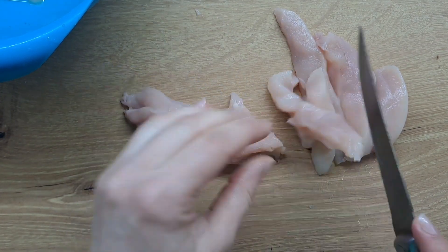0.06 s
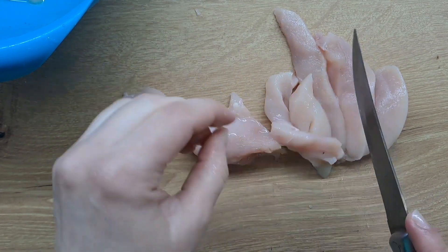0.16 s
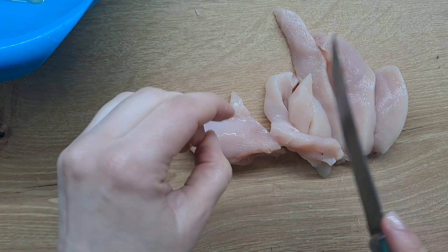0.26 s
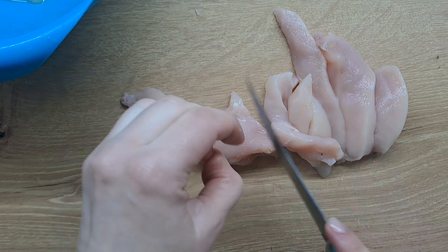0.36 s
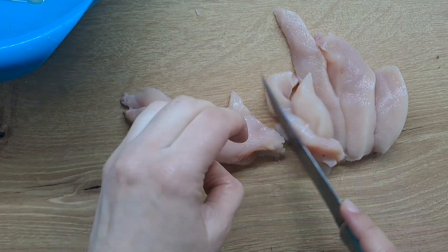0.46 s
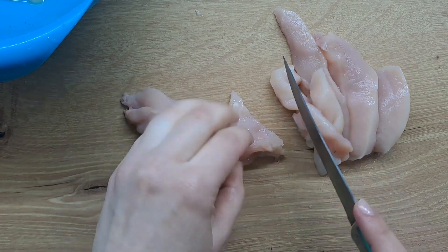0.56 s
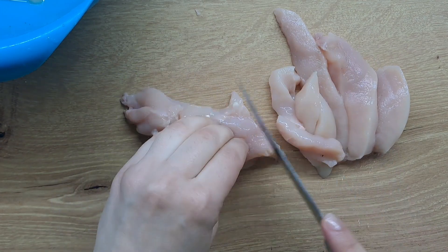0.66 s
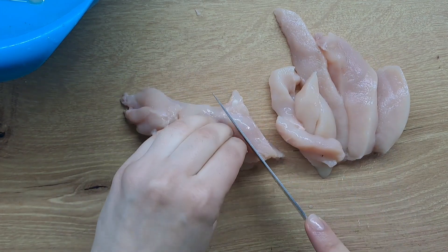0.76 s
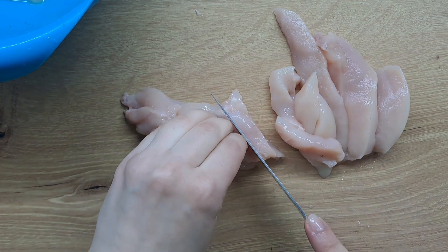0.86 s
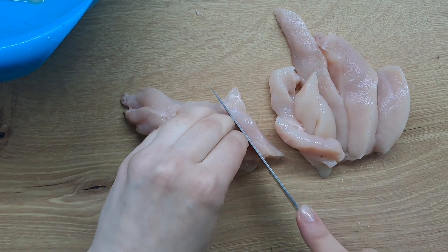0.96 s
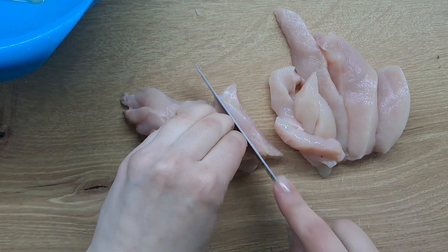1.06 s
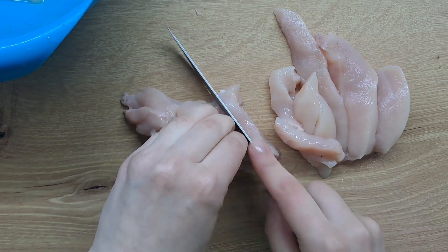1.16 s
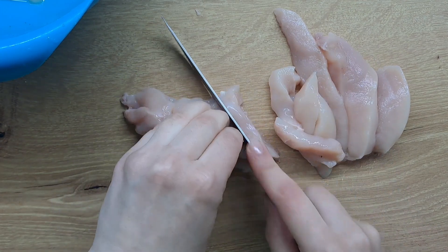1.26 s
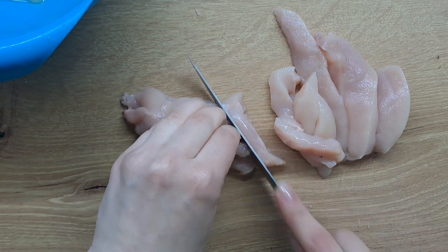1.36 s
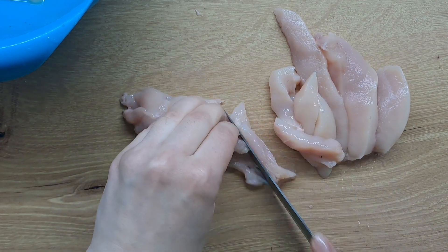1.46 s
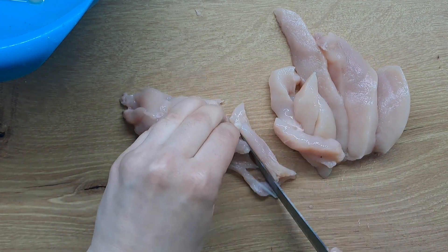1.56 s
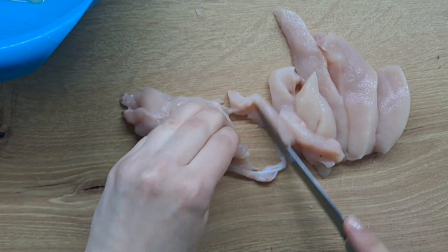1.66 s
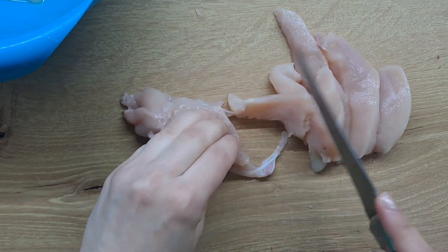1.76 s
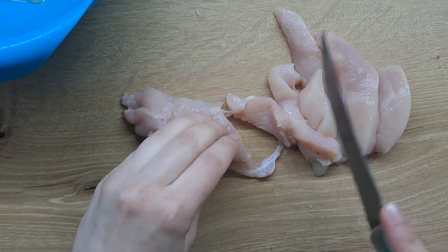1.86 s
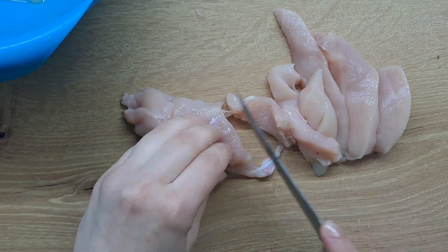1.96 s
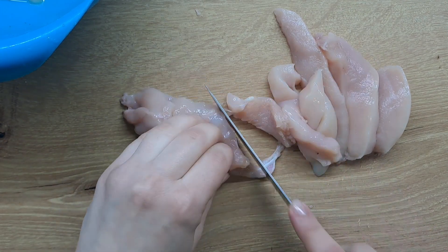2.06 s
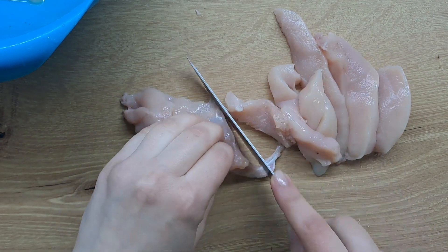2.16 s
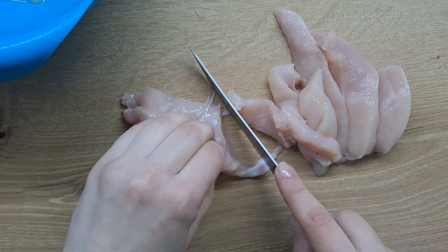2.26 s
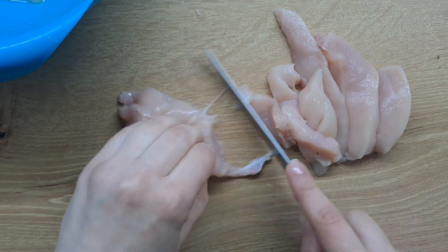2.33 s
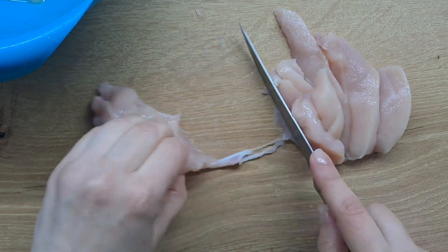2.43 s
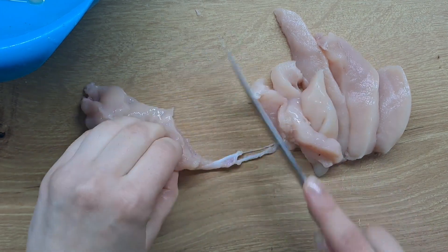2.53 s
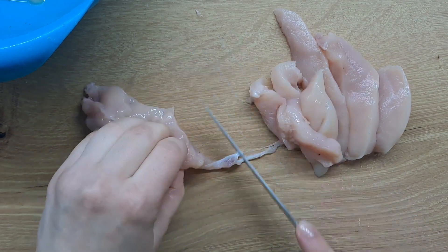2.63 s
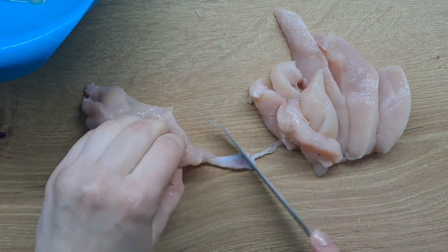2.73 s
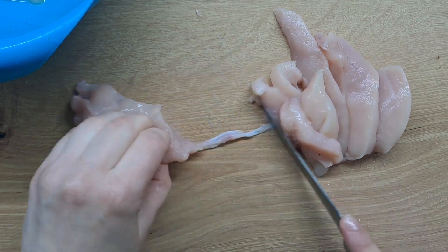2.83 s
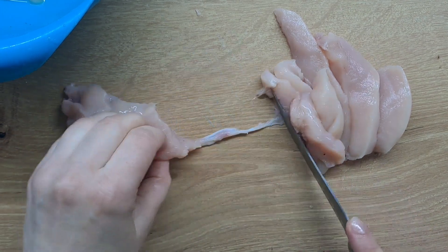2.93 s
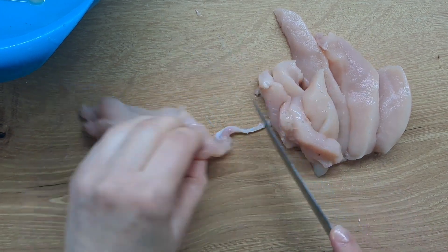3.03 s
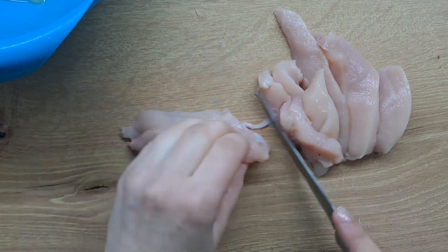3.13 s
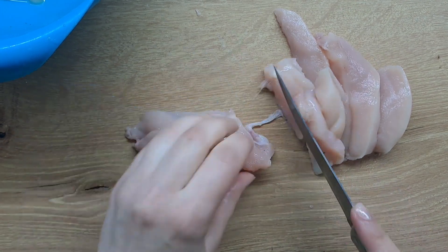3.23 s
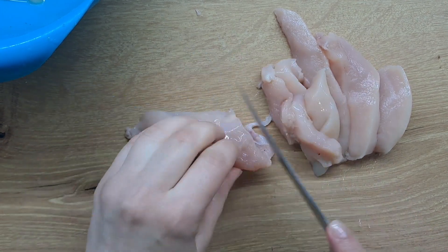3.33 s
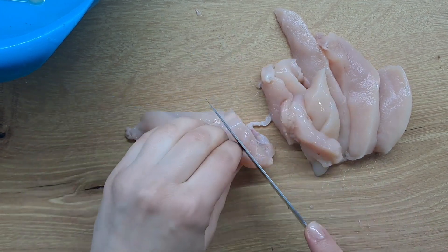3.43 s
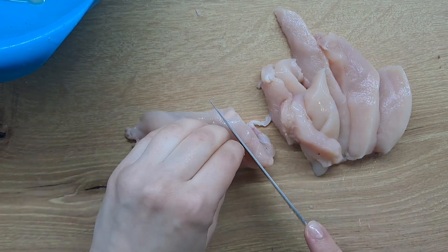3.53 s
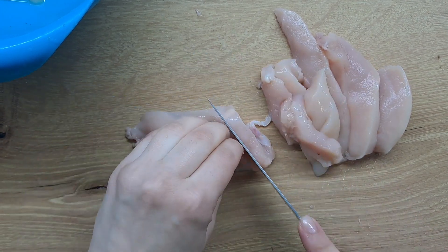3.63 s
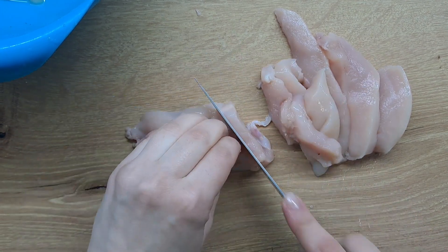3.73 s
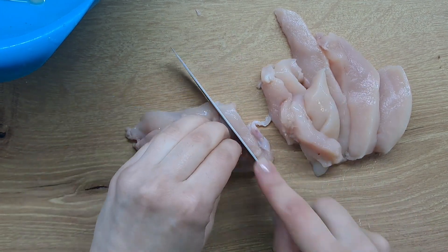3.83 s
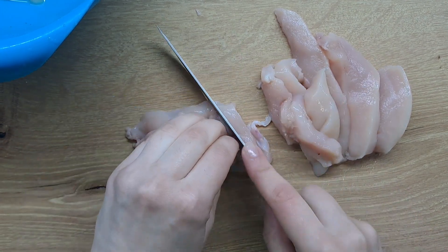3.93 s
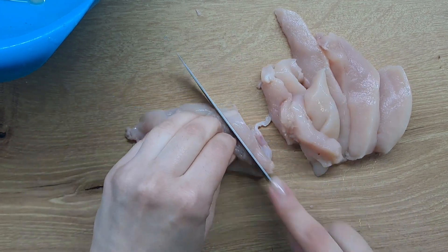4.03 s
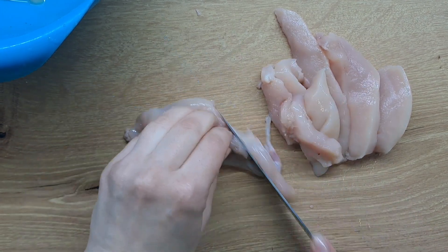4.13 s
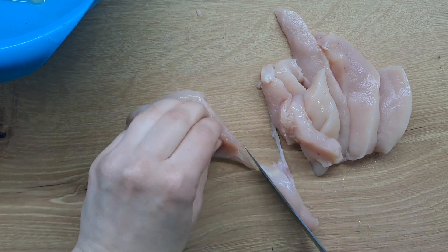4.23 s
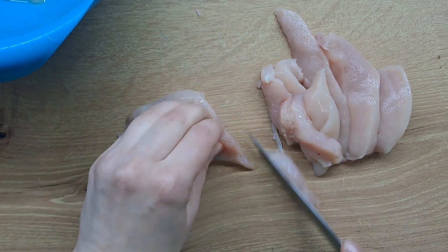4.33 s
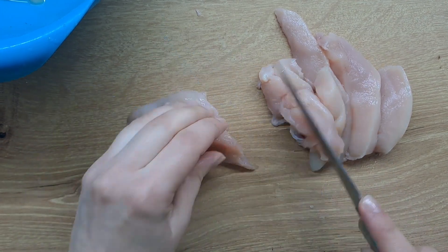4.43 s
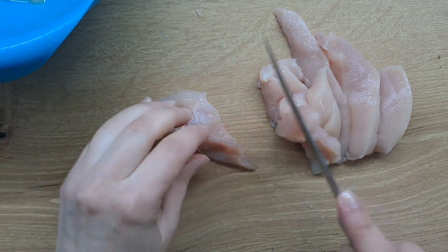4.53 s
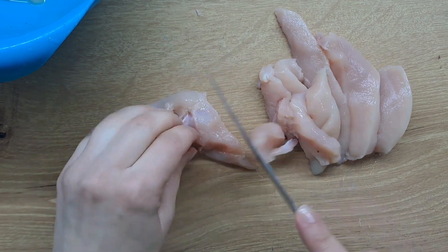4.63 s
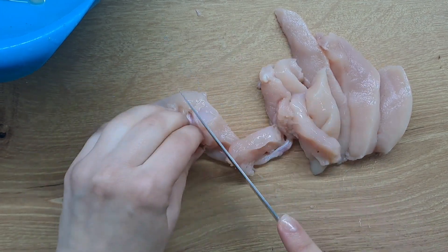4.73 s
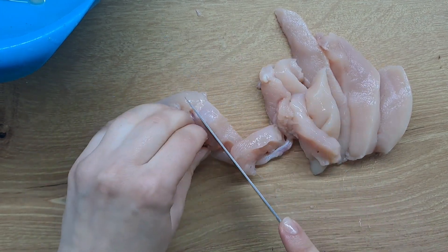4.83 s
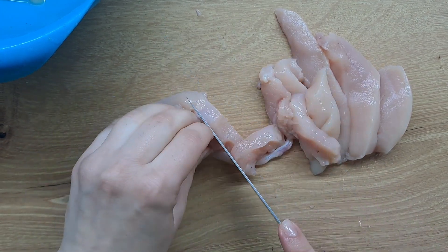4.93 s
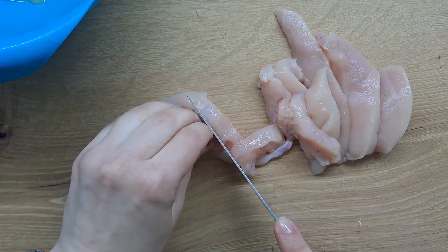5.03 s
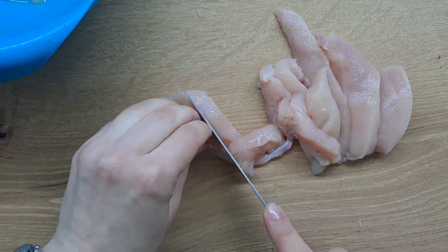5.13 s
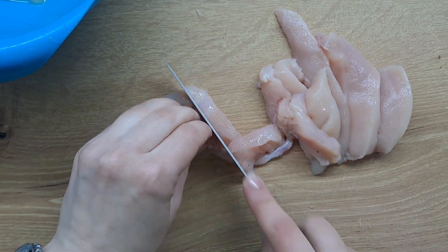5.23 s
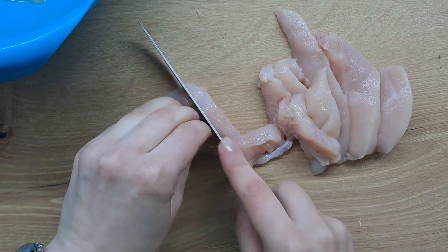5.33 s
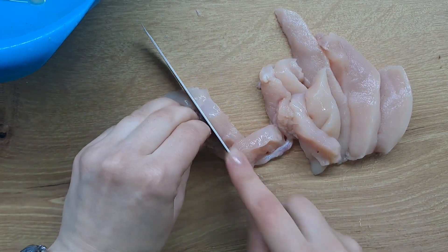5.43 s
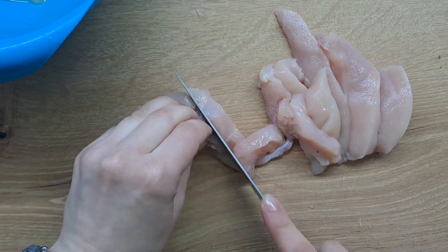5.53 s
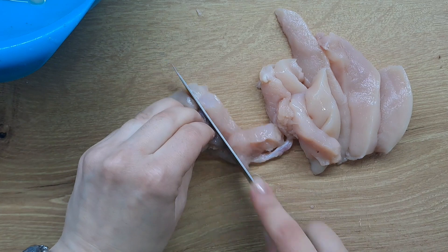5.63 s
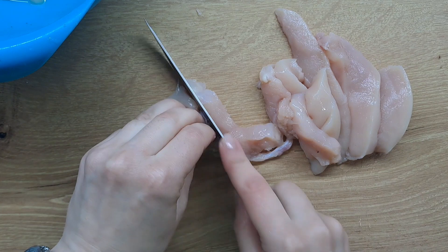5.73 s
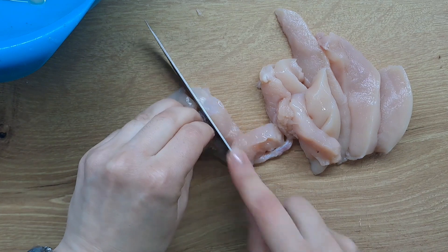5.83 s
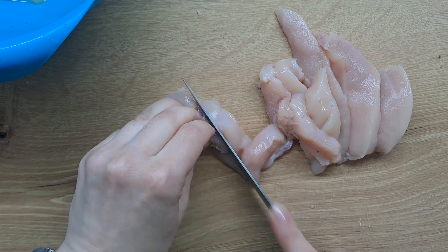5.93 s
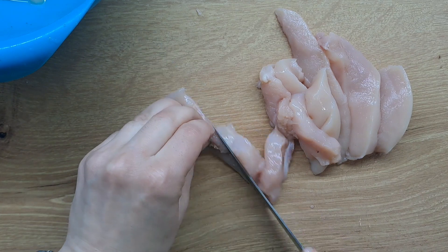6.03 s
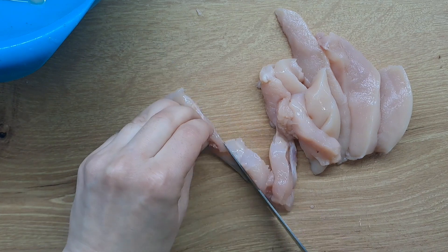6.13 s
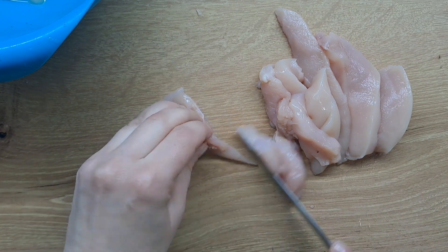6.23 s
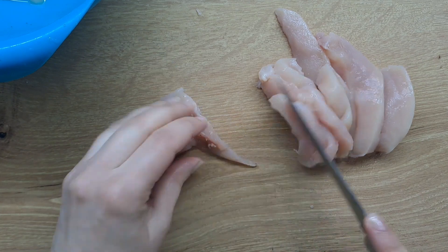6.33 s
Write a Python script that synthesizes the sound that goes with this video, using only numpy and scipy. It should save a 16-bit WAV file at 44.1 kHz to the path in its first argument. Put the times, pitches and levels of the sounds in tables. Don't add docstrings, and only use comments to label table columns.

```python
import sys
import numpy as np
from scipy import signal
from scipy.fft import rfft, irfft
from scipy.io import wavfile
from scipy.ndimage import uniform_filter1d

SR = 44100
rng = np.random.default_rng(int(sys.argv[2]) if len(sys.argv) > 2 else 0)


def gain_from_decibels(decibels):
    exponent = np.asarray(decibels, float) / 20
    return 10 ** exponent


def file_out(sig):
    cols = np.atleast_2d(sig).T
    lim = np.clip(cols, -1, 1)
    pcm = np.round(lim * 32767).astype(np.int16)
    wavfile.write(sys.argv[1], SR, pcm)


N = 281799
HZ = np.maximum(np.arange(N // 2 + 1) * SR / N, 1)
TIME = np.arange(N) / SR
# frequency in Hz, left-right likeness (-1 to 1).
ALIKE_NEAR = [(30, .7), (70, .95), (400, .88), (900, .7), (2000, .55), (6000, .1), (15000, 0)]


def rms_one(x):
    return x / np.sqrt(np.mean(x ** 2) + 1e-20)


def at_hz(points, hz):
    table_hz, values = np.array(points).T
    return np.interp(np.log(hz), np.log(table_hz), values)


def colour(x, spectrum):
    return irfft(rfft(x) * gain_from_decibels(at_hz(spectrum, HZ)), N)


def drift(rate):
    knots = rng.standard_normal(2000)
    return np.interp(TIME * rate, np.arange(2000), knots) * 1.22


def pair(a, b, alike, lag_s):
    share = np.clip(at_hz(alike, HZ), -.99, .99)
    turn = np.exp(-2j * np.pi * HZ * lag_s / (1 + (HZ / 1700) ** 4))
    mid = rfft(a) * np.sqrt(1 + share)
    side = rfft(b) * np.sqrt(1 - share)
    return irfft(np.array([mid * turn + side, mid - side]), N) / np.sqrt(2)


def resonate(x, hz, width_hz):
    r = np.exp(-np.pi * width_hz / SR)
    top = np.array([1, 0, -1]) * (1 - r * r) / 2
    return signal.lfilter(top, [1, -2 * r * np.cos(2 * np.pi * hz / SR), r * r], x)


def ring(clicks, hz, t60):
    r = gain_from_decibels(-60 / (t60 * SR))
    w = 2 * np.pi * hz / SR
    return signal.lfilter([0, np.sin(w)], [1, -2 * r * np.cos(w), r * r], clicks + 1e-18)


def modes(x, mode_table, patchy_db, weight=lambda hz: 1):
    out, power = 0, 1e-9
    for k, (hz, width_hz, level_db) in enumerate(mode_table):
        gain = gain_from_decibels(level_db) * weight(hz)
        swell = gain_from_decibels(patchy_db * drift(22))
        out = out + (-1) ** k * gain * swell * rms_one(resonate(x, hz, width_hz))
        power = power + gain ** 2
    return out / np.sqrt(power)


def background(spectrum, level_db):
    # frequency in Hz, left-right likeness (-1 to 1).
    alike_far = [(60, 0.64), (150, 0.99), (380, 0.82), (950, -0.44), (2380, -0.43), (5980, -0.061),
                 (15000, 0.081)]
    noise = pair(*rng.standard_normal((2, N)), alike_far, 0)
    return gain_from_decibels(level_db) * rms_one(colour(noise, spectrum))


def room_rumble():
    # frequency in Hz, spectral level in dB per Hz.
    rumble_spectrum = [(18, -74.5), (30, -15), (65, -18.5), (97, -5.5), (151, -7), (167, -13.5), (210, -10),
                       (245, -10), (472, -16.5), (520, -21), (707, -18), (1500, -32.5), (3000, -50),
                       (3900, -87), (6600, -120)]
    return background(rumble_spectrum, level_db=-55.5)


def microphone_hiss():
    # frequency in Hz, spectral level in dB per Hz.
    hiss_spectrum = [(1470, -36), (2500, -24.5), (4360, -10.5), (5160, -20), (5980, -4.5), (6710, -1.5),
                     (7350, -2), (7770, 3.5), (8200, -4.5), (9210, -9), (10100, -3.5), (10600, 1),
                     (11400, -5), (13000, -12.5), (15800, -6.5)]
    return background(hiss_spectrum, level_db=-69.5)


def room(x):
    out = []
    t60 = 0.7 / np.sqrt(1 + (HZ / 1820) ** 2)
    for side, lags in zip(x, rng.uniform(0.018, 0.029, (2, 4))):
        loops = [gain_from_decibels(-60 * lag / t60) * np.exp(-2j * np.pi * HZ * lag) for lag in lags]
        response = sum(g / (1 - g) for g in loops)
        out.append(irfft(rfft(side) * response, N))
    return np.array(out)


def table():
    # time in seconds, level in dB.
    shaking = [(0.0, -54), (0.5, -63.5), (0.98, -64.5), (1.23, -50.5), (1.96, -62), (2.47, -53.5),
               (3.15, -54.5), (3.35, -64), (3.56, -64.5), (3.98, -52), (4.82, -63), (5.61, -53),
               (6.03, -47), (6.39, -51)]
    # frequency in Hz, width in Hz, level in dB.
    table_modes = [(57.8, 56, 0.5), (92.3, 4, 4), (103, 3.8, -1.5)]
    # start in seconds, peak in dB, pitch in Hz.
    thumps = [(1.132, -36.5, 89), (1.176, -31, 91.7), (2.119, -42, 100), (2.36, -45.5, 92),
              (2.713, -28.5, 90.3), (2.836, -40, 97), (3.165, -37.5, 95.5), (3.873, -40.5, 90),
              (4.108, -41, 93), (5.312, -38.5, 92), (5.378, -35.5, 92), (5.91, -40, 85)]
    shake = pair(*rng.standard_normal((2, N)), ALIKE_NEAR, 0)
    shake_db = np.interp(TIME, *np.transpose(shaking)) + 2.5
    hum = gain_from_decibels(shake_db) * modes(shake, table_modes, patchy_db=-2.0)
    push = np.zeros(N + 20000)
    click = np.arange(20000) == 0
    for s, peak_db, hz in thumps:
        at = int(s * SR)
        push[at:at + len(click)] += gain_from_decibels(peak_db + 1.0) * ring(click, hz, 0.23)
    return hum + signal.lfilter([.015], [1, -.985], push[:N])


def ticks():
    # start in seconds, peak in dB, pitch in Hz, left-right balance in dB.
    tick_events = [(0.4853, -58, 10800, -1), (0.5681, -57, 12000, -3.5), (0.8954, -58, 7400, 2),
                   (0.9535, -46, 7560, -1), (1.027, -47, 14200, 13), (1.273, -39.5, 12000, -4.0),
                   (1.666, -37, 10600, 2), (1.712, -47.5, 13950, 3), (4.438, -51, 10000, 0),
                   (1.151, -52, 13000, 0), (1.733, -45, 8200, 0), (1.745, -43, 11500, 0),
                   (1.761, -47, 11500, 1), (2.0225, -48.5, 7050, -2), (2.1765, -39.5, 10000, -3),
                   (2.3565, -22.5, 3660, 0), (2.37, -28, 3200, 5), (1.6366, -40, 2470, -5),
                   (1.647, -47, 2200, -10), (2.002, -50.5, 1490, 5), (3.87, -54.5, 1310, 7),
                   (3.025, -53, 3160, -7), (3.1522, -53, 7900, -1), (3.207, -40.5, 9500, 0),
                   (3.838, -47, 11500, 4), (4.885, -55, 7940, -3), (4.912, -51.5, 8950, 1),
                   (5.1702, -47, 7800, -1), (5.214, -31, 10300, -3), (5.362, -46, 4870, 3),
                   (5.407, -50.5, 4640, -4), (5.4156, -48, 7900, -2.0), (5.6256, -51, 9500, -1),
                   (5.656, -45, 9450, 2), (5.665, -54, 14500, 0), (5.409, -49, 11500, 0),
                   (6.102, -37, 8150, 5.5), (6.101, -42, 13500, 0), (0.9, -59, 2700, -2),
                   (0.915, -65, 3500, 0), (6.1558, -41, 12900, 1), (6.308, -39, 14840, 6)]
    out = np.zeros((2, N + 800))
    decay = gain_from_decibels(-60 * np.arange(800) / SR / 0.0314)
    puffs = rng.standard_normal((len(tick_events), 2, 800))
    for (s, peak_db, hz, pan_db), puff in zip(tick_events, puffs):
        width_hz = 0.48 * hz
        burst = resonate(resonate(puff * decay, hz, width_hz), hz, width_hz)
        level_db = peak_db + np.array([[pan_db], [-pan_db]]) / 2
        at = int(s * SR)
        out[:, at:at + 800] += burst / np.abs(burst).max() * gain_from_decibels(level_db)
    return out[:, :N]


def squeaks():
    # centre in seconds, length in seconds, level in dB, pitch in Hz.
    squeak_events = [(2.362, .012, -32, 10550), (2.362, .03, -41, 3830), (2.362, .02, -36, 2060),
                     (2.427, .02, -36, 1520), (4.015, .04, -60, 7800), (4.081, .02, -49, 1650),
                     (4.123, .022, -46, 2190), (5.734, .022, -51, 12200), (5.74, .02, -44, 1350),
                     (5.885, .03, -56, 10650), (5.953, .02, -42, 7700), (5.954, .035, -55, 12300),
                     (1.449, .016, -41, 1180), (2.255, .04, -58, 1340), (1.358, .035, -41, 770),
                     (4.028, .016, -41, 920), (3.78, .07, -73, 1600), (1.488, .045, -44, 1220),
                     (4.225, .05, -49, 1350), (5.96, .04, -44, 760), (4.377, .024, -47, 3700),
                     (0.812, .035, -54, 340), (3.385, .018, -55, 430), (2.416, .04, -30, 565),
                     (1.088, .02, -70, 4500), (5.33, .05, -70, 4600), (5.47, .05, -73, 4550),
                     (4.008, .015, -52, 4000), (2.22, .07, -58, 3800), (1.638, .02, -38, 400),
                     (4.37, .04, -47, 12200)]
    out = np.zeros((2, N + 4000))
    noise = rng.standard_normal((len(squeak_events), 2, 4000))
    for (s, length_s, level_db, hz), (shared, own) in zip(squeak_events, noise):
        width_hz = 50 + .025 * hz
        source = shared + .4 * own * [[1], [-1]]
        tone = resonate(resonate(source, hz, width_hz), hz, width_hz)
        swell = np.exp(-(np.arange(-2000, 2000) / SR / length_s * 2) ** 2)
        at = int(s * SR) - 2000
        out[:, at:at + 4000] += gain_from_decibels(level_db) * rms_one(tone * swell) * np.sqrt(np.mean(swell ** 2))
    return out[:, :N]


def knocks():
    # start in seconds, peak in dB, brightness in dB per octave.
    blows = [(0.54, -75, -7), (1.166, -27.5, 16), (2.111, -46, -1), (2.702, -34.5, -10),
             (3.151, -49.5, -11), (3.42, -65, -18), (3.683, -63, -11), (3.868, -25.5, 11.5),
             (5.015, -61.5, -20), (1.411, -48, 6), (1.636, -33, 8.5), (4.343, -35, 1), (4.352, -30.5, -1),
             (5.703, -46, -6), (6.222, -41, 13), (6.233, -26, 17), (6.244, -26.5, 0)]
    # frequency in Hz, level in dB, t60 in seconds.
    struck_modes = [(300, 3.5, 0.074), (350, 9.5, 0.037), (480, -3, 0.084), (560, 13.5, 0.022),
                    (631, -7.5, 0.26), (745.6, 2.5, 0.11), (1003, -43.5, 0.032), (1135, -40, 0.074),
                    (1315, -12, 0.057), (2200, -75, .05)]
    s, peak_db, tilt_db = np.transpose(blows)
    at = (s * SR).astype(int) + 30
    out = np.zeros((2, N))
    luck_db = rng.normal(0, 1.4, (len(at), len(struck_modes), 2))
    for k, (hz, level_db, t60) in enumerate(struck_modes):
        clicks = np.zeros((2, N))
        strength_db = peak_db + level_db - 12.0 + tilt_db * np.log2(hz / 600) + luck_db[:, k].T
        clicks[:, at] = (-1) ** k * gain_from_decibels(strength_db)
        out += ring(clicks, hz, t60)
    return signal.lfilter(np.hanning(22) / 10.5, [1], out)


def grains(per_s, spread_db):
    sizes_db = spread_db * np.minimum(rng.exponential(1, (2, N)), 4)
    sizes = gain_from_decibels(sizes_db) * rng.choice([-1, 1], (2, N))
    a, b = sizes * (rng.random((2, N)) < per_s / SR)
    crowd_db = [np.interp(HZ / 60, np.arange(500), row) for row in rng.normal(0, 4.5, (4, 500))]
    crowd = gain_from_decibels(np.reshape(crowd_db, (2, 2, -1)))
    here, there = irfft(rfft(pair(a, b, ALIKE_NEAR, lag_s=-.00017)) * crowd, N)
    slide = np.clip(.5 + .7 * drift(14), 0, 1)
    return here * slide + there * (1 - slide)


def board_echo(x, share, notch_hz):
    step = np.arange(N)
    lag = SR / 2 / (notch_hz * gain_from_decibels(.4 * drift(4)))
    return np.array([side + share * np.interp(step - lag, step, side) for side in x])


def patches(x, patchy_db):
    spectrum = rfft(x)
    centres = np.log2(np.geomspace(2000, 16000, num=10))
    shares = [np.interp(np.log2(HZ), centres, row) for row in np.eye(len(centres))]
    return sum(irfft(spectrum * share, N) * gain_from_decibels(patchy_db * drift(18)) for share in shares)


def blade_notch(x):
    # time in seconds, cancelled frequency in Hz.
    notch_path = [(1.17, 6100), (1.36, 6350), (1.43, 5670), (1.52, 6170), (1.65, 6500), (2.35, 6530),
                  (2.42, 6950), (2.85, 5330), (3.88, 6100), (4.0, 5440), (4.19, 5400), (4.26, 6300),
                  (4.38, 6150), (5.3, 5420), (5.7, 5800), (6.3, 5600)]
    notch_hz = np.interp(TIME, *np.transpose(notch_path))
    turn = np.exp(2j * np.pi * np.cumsum(notch_hz) / SR)
    r = np.exp(-2 * np.pi * 330 / SR)
    band = np.real(signal.lfilter([1 - r], [1, -r], x / turn) * turn)
    depth = .97 * np.clip(1.6 + 0.23 * drift(11), 0, 1)
    return x - 2 * depth * band


def envelope(after, rise_s, hold_s, kind):
    knee_s = rise_s + hold_s + kind["knee_db"] / kind["fall_db_s"]
    times = [0, rise_s, rise_s + hold_s, knee_s, knee_s + 1]
    levels_db = [-kind["from_db"], 0, 0, -kind["knee_db"], -kind["knee_db"] - kind["tail_db_s"]]
    return np.interp(after, times, levels_db)


def stroke_controls():
    cut_kinds = dict( land=dict(from_db=20, fall_db_s=238, knee_db=5, tail_db_s=122, boom_db=-3.5, hiss_db=-7.5, touch_db=15.5, lead=0.098, give=0.31, hiss_db_s=-28.5, boom_db_s=-5.5, glide_oct_s=-0.69, upper_db=-0.5, bright_db=1, tip_db=-17, heel_db=-48),
                 push=dict(from_db=13.5, fall_db_s=348, knee_db=-8, tail_db_s=250, boom_db=-3, hiss_db=-5, touch_db=6, lead=0.04, give=0.037, hiss_db_s=-25, boom_db_s=-12, glide_oct_s=-.3, upper_db=2.5, bright_db=3, tip_db=-8, heel_db=-29),
                 draw=dict(from_db=22.5, fall_db_s=171, knee_db=8, tail_db_s=212, boom_db=-11.5, hiss_db=-4, touch_db=0, lead=0.22, give=0.48, hiss_db_s=-19.5, boom_db_s=-17.5, glide_oct_s=0.071, upper_db=-0.5, bright_db=2, tip_db=-21, heel_db=-28),
                 flick=dict(from_db=17, fall_db_s=473, knee_db=7.5, tail_db_s=212, boom_db=-2, hiss_db=-6, touch_db=8.5, lead=0.95, give=0.12, hiss_db_s=-6, boom_db_s=-4, glide_oct_s=-0.25, upper_db=0.5, bright_db=2, tip_db=-16, heel_db=-5),
                 tip=dict(from_db=17, fall_db_s=260, knee_db=18.5, tail_db_s=175, boom_db=6, hiss_db=-1.5, touch_db=1, lead=0.443, give=0.051, hiss_db_s=-50.5, boom_db_s=5, glide_oct_s=-0.16, upper_db=1.5, bright_db=3, tip_db=0, heel_db=-37),
                 saw=dict(from_db=4.5, fall_db_s=397, knee_db=5.5, tail_db_s=126.5, boom_db=9, hiss_db=-7, touch_db=-2, lead=0.73, give=0.059, hiss_db_s=-13, boom_db_s=-5, glide_oct_s=-0.29, upper_db=2, bright_db=4.5, tip_db=-0.5, heel_db=-20.5),
                 sweep=dict(from_db=4.5, fall_db_s=230, knee_db=11, tail_db_s=152, boom_db=5, hiss_db=-5, touch_db=4, lead=.6, give=-0.19, hiss_db_s=-63, boom_db_s=-11, glide_oct_s=-2.5, upper_db=-5, bright_db=3.5, tip_db=-5, heel_db=-26))
    light_kinds = dict( pat=dict(from_db=6, fall_db_s=258, knee_db=7, tail_db_s=200, boom_db=45, hiss_db=-26, upper_db=-1, bright_db=.1, tip_db=-21, heel_db=-21),
                   nudge=dict(from_db=19, fall_db_s=232, knee_db=23, tail_db_s=300, boom_db=11.5, hiss_db=1.5, upper_db=-6, bright_db=2.5, tip_db=-23, heel_db=-30),
                   slide=dict(from_db=12.5, fall_db_s=244, knee_db=25, tail_db_s=140, boom_db=1.5, hiss_db=6, upper_db=12.5, boom_db_s=3, bright_db=6.5, tip_db=-28, heel_db=-40))
    still = dict(touch_db=0, lead=0, give=0, hiss_db_s=0, boom_db_s=0, glide_oct_s=0)
    # start, rise and hold in seconds, peak in dB, board centre in Hz.
    cuts = dict( land=[(1.166, 0.0022, 0.013, -35, 725), (2.112, 0.0011, 0.0027, -53.5, 590),
            (3.866, 0.0058, 0.011, -41, 790)], push=[(1.27, 0.073, 0.0049, -40, 760),
            (3.96, 0.074, 0.0066, -41, 814)], draw=[(1.404, 0.0063, 0.1, -37.5, 915),
            (4.04, 0.048, 0.12, -35.5, 700), (5.692, 0.017, .01, -41.5, 800), (5.7, 0.033, 0.011, -42, 700),
            (5.815, 0.12, 0.087, -34.5, 820)], flick=[(1.625, 0.016, 0.0043, -35, 456),
            (4.335, 0.031, 0.005, -31.5, 492), (6.216, 0.038, 0.0039, -30.5, 560)],
            saw=[(2.172, 0.055, 0.03, -50.5, 657)], tip=[(2.341, 0.013, 0.079, -32, 581)],
            sweep=[(2.829, 0.0051, 0.048, -36.5, 494)])
    # start, rise and hold in seconds, peak in dB, board centre in Hz.
    handling = dict( pat=[(.77, 0.039, .004, -96, 336), (3.125, 0.029, 0.0046, -102, 315),
                (3.39, 0.011, 0.0044, -101, 440), (3.66, 0.018, .004, -101, 330),
                (5.005, 0.014, 0.0038, -87.5, 383)], nudge=[(1.97, 0.054, 0.0036, -74, 357),
                (4.3, 0.04, 0.006, -52, 456), (5.3, 0.059, 0.0044, -59.5, 316),
                (5.65, 0.045, .004, -62.5, 360)], slide=[(1.025, 0.0018, 0.16, -72, 405),
                (3.17, 0.021, .004, -82.5, 506), (3.75, 0.0036, .115, -75.5, 422),
                (3.875, 0.0092, .015, -52.5, 750), (4.17, 0.038, 0.032, -57, 750),
                (5.165, 0.055, .004, -68, 600), (5.211, 0.006, 0.0096, -55, 308),
                (5.25, 0.016, 0.1, -66, 302), (5.38, 0.11, 0.045, -68, 308), (5.56, 0.036, 0.12, -90, 400),
                (5.83, 0.055, 0.035, -47, 750), (6.05, 0.013, 0.04, -57.5, 700)])
    reach = dict(tip=-60, sweep=-14, flick=-40)
    power, grip = np.zeros((3, N)), np.zeros((6, N))
    firmest_db, centre_hz = np.full(N, -200.), np.full(N, 500.)
    for name, rows in {**cuts, **handling}.items():
        kind = cut_kinds.get(name) or {**still, **light_kinds[name]}
        for s, rise_s, hold_s, peak_db, hz in rows:
            on = slice(int(s * SR), int((s + .45) * SR))
            after = TIME[on] - s
            flat = 0 * after
            slack_db = envelope(after, rise_s, hold_s, kind)
            press_db = peak_db + slack_db

            bite_s = rise_s * (1 - kind["lead"])
            bite = np.exp(-((after - bite_s) / 0.017) ** 2)
            boom_db = kind["boom_db"] + kind["touch_db"] * bite
            boom_db = boom_db + kind["boom_db_s"] * after - kind["give"] * slack_db
            hiss_db = kind["hiss_db"] + kind["hiss_db_s"] * after
            power[:, on] += gain_from_decibels(2 * (press_db + np.array([boom_db, flat, hiss_db])))

            leads = press_db > firmest_db[on]
            firmest_db[on] = np.maximum(firmest_db[on], press_db)
            sag_oct = .008 * slack_db * (after > rise_s)
            here_hz = hz * 2 ** (kind["glide_oct_s"] * (after - rise_s) + sag_oct)
            centre_hz[on] = np.where(leads, np.clip(here_hz, 290, 900), centre_hz[on])

            upper_db = kind["upper_db"] + 0.26 * (peak_db + 38)
            tip_db = np.minimum(kind["tip_db"] + 0.085 * slack_db, 3)
            heel_db = np.minimum(kind["heel_db"] + 0.085 * slack_db, 3)
            thin, reach_db = float(name == "slide"), reach.get(name, -32)
            here = np.array([flat + upper_db, flat + kind["bright_db"], tip_db, heel_db,
                             flat + thin, flat + reach_db])
            grip[:, on] = np.where(leads, here, grip[:, on])
    gains = uniform_filter1d(np.sqrt(power), size=90)
    return gains, centre_hz, uniform_filter1d(grip, size=200)


def scrape():
    # frequency in Hz, width in Hz, level in dB.
    low_modes = [(290, 51, 5.5), (368.2, 16.8, 2.5), (421.4, 32.5, -3), (493, 104, 6.5), (517, 43, 0),
                 (571, 15, -4.5), (603.4, 14, 0.5), (627, 130, 6), (750, 28, 5), (813.5, 5.9, -0.5)]
    # frequency in Hz, width in Hz, level in dB.
    upper_modes = [(900, 43, 3), (1116, 170, 9), (1363, 150, 8), (1510, 70, -2.5), (1703, 120, 3.5),
                   (1994, 50, -4.5), (2177, 170, 5), (2920, 470, 3.5), (3200, 760, 4), (3720, 570, -1.5),
                   (4410, 2300, -9.5)]
    # frequency in Hz, spectral level in dB per Hz.
    edge_spectrum = [(2000, -5), (3300, -4.5), (4500, -4), (6100, -1.5), (7600, -3.5), (9500, -11.5),
                     (12200, -13), (14000, -16.5), (15800, -11)]
    # frequency in Hz, width in Hz, level in dB.
    tip_modes = [(3690, 40, -6), (3840, 30, -5), (4530, 40, -11), (10570, 160, 0), (12750, 350, -5)]
    # frequency in Hz, width in Hz, level in dB.
    heel_modes = [(3700, 60, -8), (7700, 250, -2), (12200, 400, 0)]
    (boom, press, hiss), centre_hz, grip = stroke_controls()
    upper_db, bright_db, tip_db, heel_db, thin, reach_db = grip
    rough = gain_from_decibels(1.0 * drift(60) + 0.5 * drift(250))
    coarse = grains(2500, spread_db=2.5)
    fine = grains(9000, spread_db=3.0)

    def near_contact(hz):
        return gain_from_decibels(reach_db * np.log2(hz / centre_hz) ** 2)

    def upper_tilt(hz):
        return gain_from_decibels(upper_db * np.log2(hz / 1500))

    low = modes(coarse, low_modes, patchy_db=3.5, weight=near_contact)
    low = signal.sosfilt(signal.butter(2, [270, 1150], "band", fs=SR, output="sos"), low)
    upper = modes(coarse, upper_modes, patchy_db=2.0, weight=upper_tilt)
    missed = np.clip((centre_hz - 570) / 100, .15, .92)
    upper = upper - missed * resonate(upper, 1750, 450)

    air = board_echo(colour_pair(fine, edge_spectrum), share=.6, notch_hz=6100)
    air = rms_one(patches(air, patchy_db=2.5))
    dull = signal.sosfilt(signal.butter(2, 7000, fs=SR, output="sos"), air)
    bright = air - dull
    air = dull * gain_from_decibels(-bright_db + 1.2 * drift(25)) + bright * gain_from_decibels(bright_db + 1.2 * drift(25))
    thin_air = signal.sosfilt(signal.butter(6, 3500, "high", fs=SR, output="sos"), air)
    air = air + thin * (thin_air - air)

    tip = gain_from_decibels(tip_db) * modes(fine, tip_modes, patchy_db=2.5)
    heel = gain_from_decibels(heel_db) * modes(fine, heel_modes, patchy_db=3.0)
    board = boom * low + blade_notch(press * upper + hiss * air)
    return rough * (board + hiss * (tip + heel))


def colour_pair(x, spectrum):
    return colour(x, spectrum)


def scene():
    blows = knocks() + ticks()
    fade = np.clip((TIME[-1] - TIME) / .25, 0, 1)
    echoes = gain_from_decibels(-11.5) * room(blows * fade)
    floor = room_rumble() + microphone_hiss()
    return floor + table() + blows + echoes + squeaks() + scrape()


def low_pass(x):
    return signal.sosfilt(signal.butter(12, 16970, fs=SR, output="sos"), x)


def record(dry):
    # frequency in Hz, left-right balance in dB.
    mic_balance = [(60, 2.5), (250, 1), (900, -1), (1500, 0.5), (4500, -1), (6000, -5), (7800, 1.5),
                   (9500, -1), (12000, -7), (14000, -3), (15800, -6.5)]
    # frequency in Hz, response in dB.
    range_response = [(20, -12), (45, 0), (15800, 0), (15950, -60)]
    half_db = at_hz(mic_balance, HZ) / 2
    colours = gain_from_decibels(at_hz(range_response, HZ) + np.array([half_db, -half_db]))
    mix = irfft(rfft(dry) * colours, N)
    return low_pass(mix)


dry = scene()
out = record(dry)
file_out(out)
```